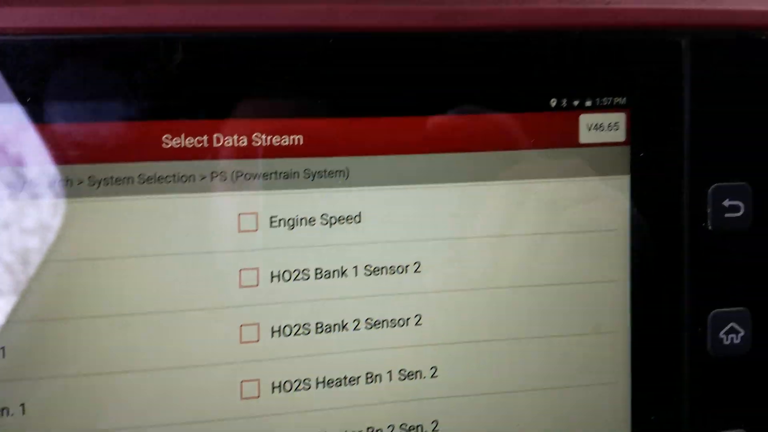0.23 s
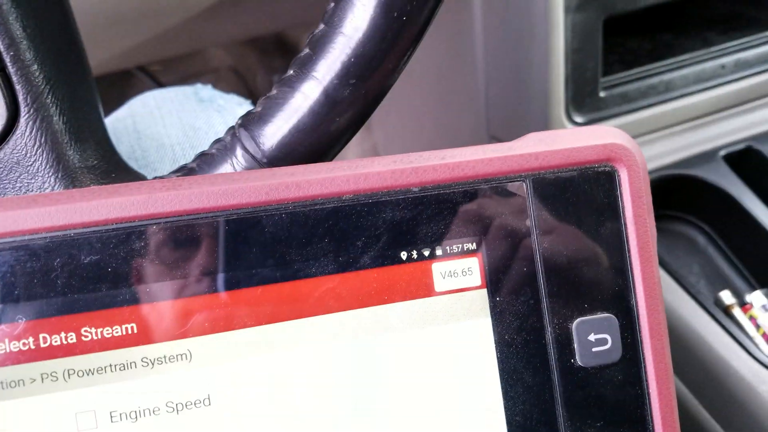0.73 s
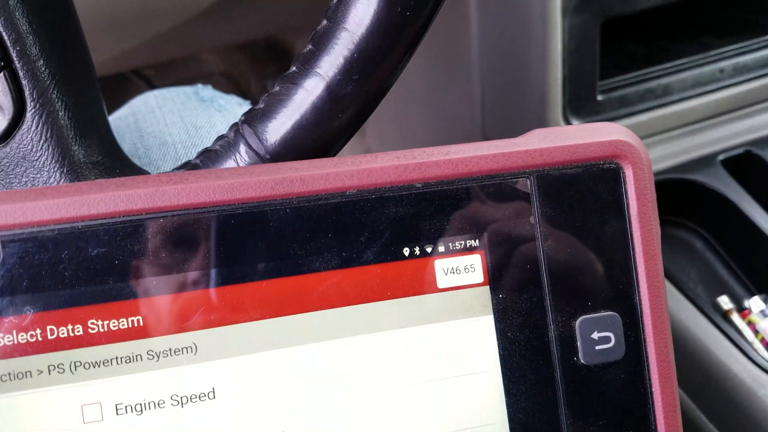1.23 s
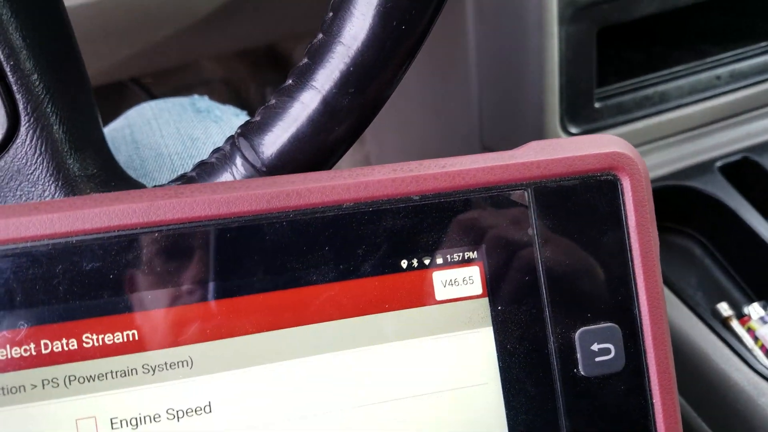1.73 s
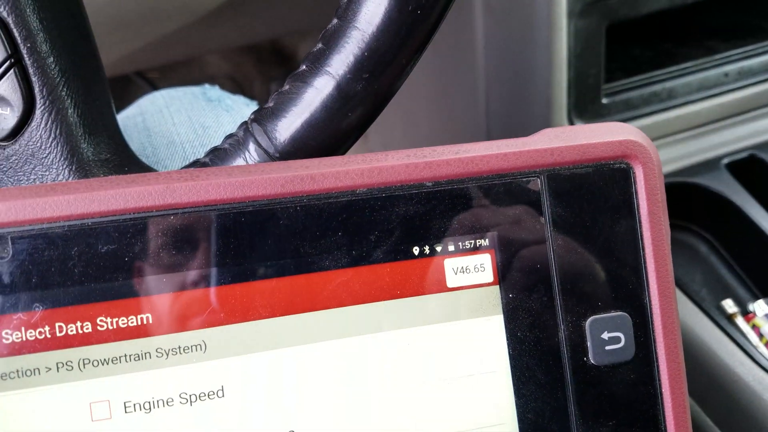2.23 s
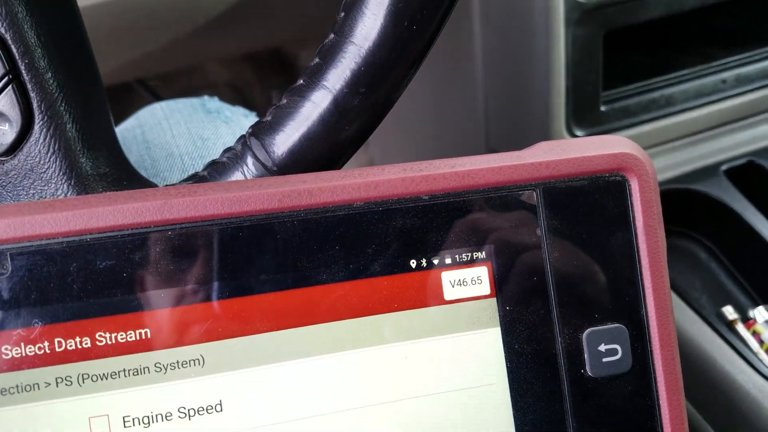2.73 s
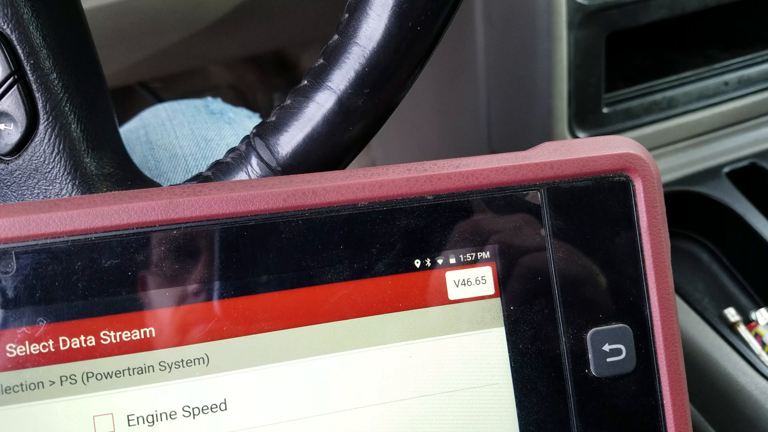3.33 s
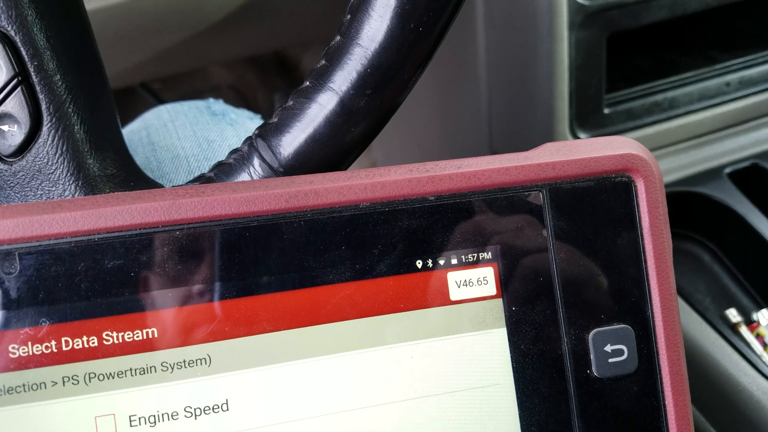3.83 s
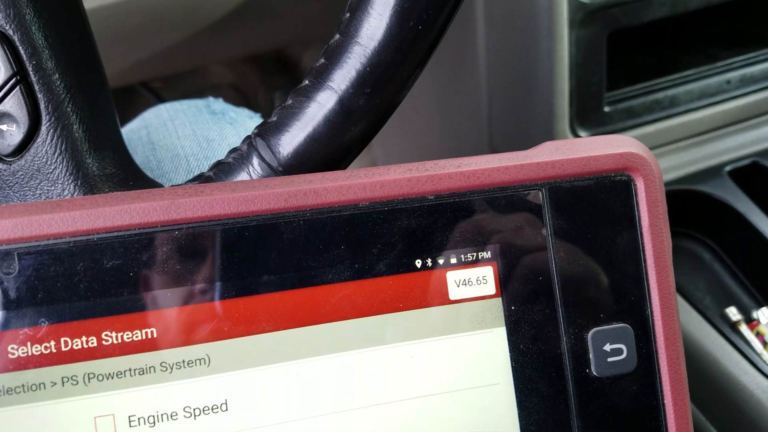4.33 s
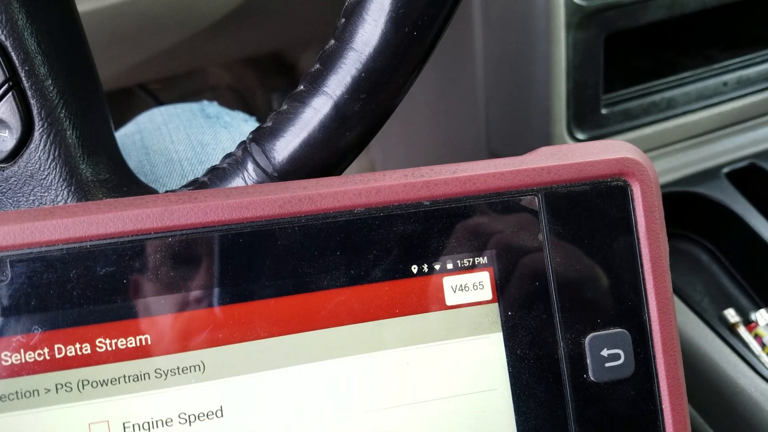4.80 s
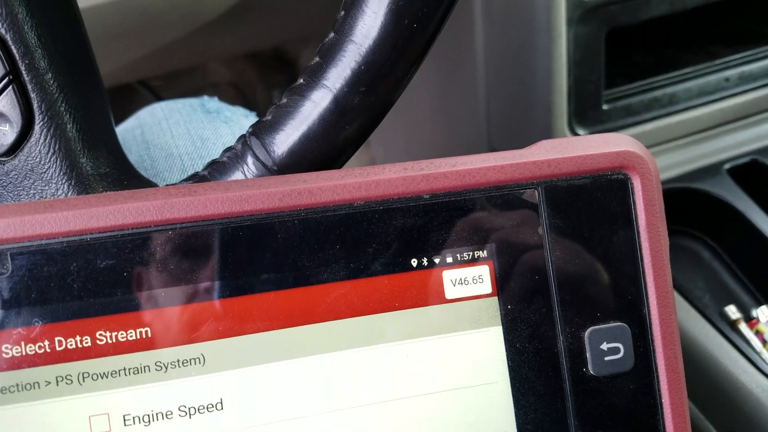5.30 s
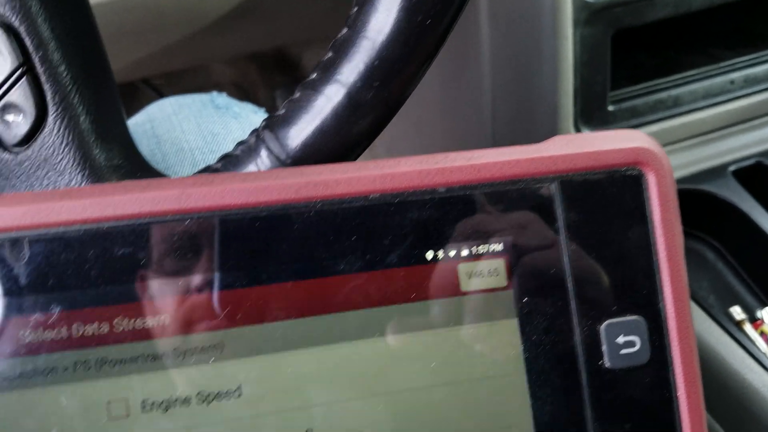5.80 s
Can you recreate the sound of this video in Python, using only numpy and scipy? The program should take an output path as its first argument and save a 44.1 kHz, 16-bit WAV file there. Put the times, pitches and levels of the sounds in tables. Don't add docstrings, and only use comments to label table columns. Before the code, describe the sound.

Continuous rough idle of a big petrol engine, captured in stereo within the cab. Bassy lumpy firing pulses dominate, about five engine cycles a second, with swelling rumble in the footwell and dull panel thuds. Irregular metallic ticks and a light airy rattle ride above. The effort hunts early and becomes steadier later; two airy fabric strokes pass close by near the end. The sound never stops.

```python
import sys
import numpy as np
from scipy import signal
from scipy.fft import rfft, irfft, next_fast_len
from scipy.io import wavfile
from scipy.ndimage import uniform_filter1d

SR = 44100
rng = np.random.default_rng(int(sys.argv[2]) if len(sys.argv) > 2 else 0)


def digitize_waveform(pressure):
    field = np.atleast_2d(pressure).T
    bounded = np.clip(field, -1, 1)
    quanta = np.round(bounded * 32767).astype(np.int16)
    wavfile.write(sys.argv[1], SR, quanta)


def elevation(decibels):
    levels = np.asarray(decibels, float)
    return 10 ** (levels / 20)


N = 267157
T = np.arange(N) / SR

CYCLE_HZ = 5.39
# time_s, lead_cycles
CRANK_LEAD = [(0.0, 0.0006), (0.337, 0.0392), (0.673, 0.012), (0.841, 0.0321), (1.178, 0.0107),
              (1.514, 0.0079), (1.851, -0.0194), (2.188, -0.0047), (2.524, -0.0153), (2.692, -0.0051),
              (3.702, -0.0117), (4.207, 0.0121), (4.375, -0.0193), (4.712, 0.0055), (4.88, -0.0003),
              (5.553, -0.0044), (5.721, 0.008), (6.058, 0.0047)]
# time_s, effort_db
LOAD = [(0, 5.5), (.17, 5), (.47, -2.5), (.72, 4), (1.03, -2.5), (1.32, 2.5), (1.6, -2.5), (2.2, -0.5),
        (3.3, -3), (3.8, 1), (4.1, -0.5), (4.4, 2.5), (4.7, 0), (5.2, -1.5), (6.06, -1)]
# place_cycles, strength_db
CYLINDERS = [(-0.013, -10.8), (0.125, 0.1), (0.243, -6.7), (0.335, -4.9), (0.485, 0.0), (0.559, -3.9),
             (0.761, -2.6), (0.857, -4.5)]
# pitch_hz, width_hz, level_db, sign
CAB = [(26.5, 6, -34.5, 1), (51.5, 14.1, -17.7, 1), (49.3, 7, -13.8, -1), (83.3, 6.1, -23.7, 1),
       (92.1, 25.8, -27.2, -1), (146.9, 11, -22.2, -1), (147.9, 6, -20.5, 1), (117.6, 7.8, -33.1, 1)]
# pitch_hz, level_db
RUMBLE = [(22, -12), (36, -10.5), (50, 0), (66, -3.5), (88, -4.5), (100, -3), (132, 0), (152, -1.5),
          (180, -9), (192, -21.5), (215, -19.5), (235, -23), (350, -23), (480, -44)]
# peak_s, level_db, pitch_hz
SURGES = [(0.169, -10, 171.3), (0.513, -15, 168), (0.765, -16, 179), (1.323, -13, 169), (1.64, -13, 174.7),
          (1.823, -15.5, 174.3), (2.003, -15.0, 163), (2.451, -14, 176), (2.743, -25, 172),
          (3.009, -20, 174), (3.12, -21, 174), (3.307, -24.5, 174), (3.488, -17.5, 167.5),
          (3.759, -13, 178), (4.04, -34, 164), (4.423, -10.7, 173), (4.485, -12, 181), (4.792, -17, 161),
          (5.043, -16.5, 173.6), (5.152, -18, 162), (5.341, -19.5, 165.4), (5.6, -10.5, 175.3),
          (5.698, -9, 153.5)]
# peak_s, level_db, pitch_hz
THUMPS = [(0.01, -20.7, 300), (0.048, -23.0, 322), (0.121, -25.0, 288), (0.178, -23, 309),
          (0.249, -21.5, 300), (0.297, -23.5, 295), (0.56, -17.5, 313), (0.71, -22.5, 294),
          (1.094, -25.5, 294), (1.129, -27, 300), (1.263, -21.0, 312), (1.829, -25, 294), (2.05, -22, 304),
          (2.388, -24, 301), (2.469, -24.5, 315), (2.603, -24, 299), (2.946, -18, 297), (3.028, -20, 310),
          (3.348, -29, 303), (3.77, -20.5, 308.5), (3.865, -17, 298), (3.959, -22.5, 302),
          (4.088, -19.5, 304), (4.459, -16.5, 300), (4.58, -29, 282), (4.978, -24.1, 301),
          (5.012, -22.5, 294), (5.535, -23.5, 296), (5.565, -23, 301), (5.91, -18.8, 304)]
# place_cycles, door_panel_db, clatter_db, length_s
KNOCKS = [(.5, -30, -1.5, 0.034), (.24, -39.5, 0, 0.044), (.9, -44, 2.5, 0.026), (0.664, -45, -11.5, 0.066),
          (0.32, -44.5, -23.5, 0.0061), (0.088, -39.5, -4, 0.03)]
# pitch_hz, width_hz, level_db
CLATTER = [(607, 61, -59.5), (745, 30, -54), (808, 48, -51.5), (1880, 67, -56), (2027, 65, -58.5),
           (2220, 27, -57.5), (2490, 38, -61.5), (2777, 80, -63.5), (3252, 34, -62.5), (3480, 59, -63.5),
           (3870, 49, -64.5), (4400, 130, -77), (5010, 130, -67.5), (5490, 110, -68.5), (6230, 160, -82)]
# pitch_hz, density_db_per_hz
ROAR = [(450, -11.5), (490, -14), (560, -10), (820, -11.5), (1100, -8), (1550, -14), (1830, -14.5),
        (2180, -22), (3060, -22.5), (4400, -43.5), (6000, -33), (9000, -40)]
# pitch_hz, density_db_per_hz
HISS = [(2000, -9.5), (3000, 3), (5000, -1.5), (6700, -3), (7300, -7), (9300, -13), (11500, -4),
        (14000, -3), (16500, -5.5)]
# place_cycles, low_ring_db, high_ring_db, high_ring_hz
TAPPETS = [(.94, -44.5, -53, 3400), (.555, -38, -47.5, 5080), (.24, -48, -65, 2200),
           (0.099, -49.5, -51.5, 2300)]
TAPPET_HZ = (1870, 1990, 2210, 2450)
# start_s, low_ring_db, low_ring_hz, high_ring_db
LOUD_TICKS = [(0.0937, -41, 2060, -54), (0.157, -30, 2200, -35), (0.2443, -31, 2230, -64),
              (0.7203, -29, 1910, -42), (0.8425, -47, 2220, -36), (0.9168, -36, 1910, -46),
              (1.103, -39, 2030, -74), (1.2082, -44, 1890, -48), (1.3578, -33, 2280, -53),
              (1.8043, -31, 1860, -43), (2.0482, -46, 2050, -38), (2.144, -33.5, 2450, -38.5),
              (2.2174, -30, 2220, -53), (2.4049, -36, 1990, -65), (2.4588, -33, 2110, -51),
              (2.5726, -28, 1880, -34.5), (3.0749, -33.5, 2210, -43), (3.8157, -30.5, 1856, -58),
              (4.1839, -32, 1870, -44), (4.377, -32.5, 2130, -45), (4.4722, -37, 1790, -35),
              (4.6404, -35.5, 2490, -46), (4.7446, -34, 2200, -45), (4.9851, -34.5, 2290, -34.5),
              (5.1158, -32, 2210, -44.5), (5.6595, -30, 1850, -41), (5.7418, -31, 1953, -65),
              (5.8566, -34.5, 2210, -51)]
# peak_s, over_hiss_db, rise_s, fall_s
BRUSHES = [
    (4.94, 6, 0.32, 0.16),
    (5.42, 8, 0.086, .22),
]
# pitch_hz, shared_fraction
ALIKE = [(100, .995), (300, .95), (600, .8), (1200, .74), (2400, .52), (5000, .34), (9000, .15)]
# pitch_hz, left_minus_right_db
TILT = [(40, -.6), (80, .5), (160, .2), (300, 0), (1000, -1.3), (2400, -3.8), (4400, -4), (7500, -13),
        (10000, -13), (13000, -3)]
# pitch_hz, delay_ms
LAG = [(100, .38), (170, .38), (300, .22), (550, .17), (1200, .4), (3000, .44), (15000, .5)]


def evened(x):
    return x / np.sqrt(np.mean(x ** 2) + 1e-20)


def read(points, hz):
    f, value = np.transpose(points)
    return np.interp(np.log(hz + 1), np.log(f + 1), value)


def colour(x, points):
    hz = abs(np.fft.fftfreq(32768, 1 / SR))
    below = (points[0][0] / 2, points[0][1] - 30)
    above = (points[-1][0] * 2, points[-1][1] - 30)
    log_gain = np.log(elevation(read([below] + list(points) + [above], hz)))
    response = np.exp(log_gain - 1j * signal.hilbert(log_gain).imag)
    taps = np.fft.ifft(response).real[:12000]
    return evened(signal.oaconvolve(x, taps[None], axes=1)[:, :N])


def ring(x, hz, width_hz):
    b, a = signal.iirpeak(hz, hz / width_hz, SR)
    return signal.sosfilt([[*b, *a]] * 2, x)


def puff(length_s):
    u = np.arange(round(5 * length_s * SR)) / (length_s * SR)
    return np.e * 2 * u * np.exp(-2 * u)


def swells(rows, length_s):
    out = np.zeros(N)
    for s, db, hz in rows:
        first, last = round((s - length_s / 2) * SR), round((s + length_s / 2) * SR)
        near = slice(max(first, 0), last)
        t = T[near] - s
        out[near] += elevation(db) * np.cos(np.pi * t / length_s) ** 2 * np.sin(2 * np.pi * hz * t)
    return out


def patchy(x, spread_db):
    z = signal.stft(x, nperseg=256)[2]
    patches = uniform_filter1d(rng.standard_normal(z.shape[1:]), size=4, axis=0)
    patches = uniform_filter1d(patches, size=9, axis=1)
    return evened(signal.istft(z * elevation(spread_db * evened(patches)), nperseg=256)[1][:, :N])


def cycles():
    return CYCLE_HZ * T + np.interp(T, *np.transpose(CRANK_LEAD))


def load_db():
    return np.interp(T, *np.transpose(LOAD))


def strikes(place, spread_db, jitter_s):
    draw = rng.standard_normal((40, 2))
    on_time_s = np.interp(np.arange(-1, 39) + place, cycles(), T, -1, 99)
    at = (on_time_s + jitter_s * draw[:, 0]) * SR
    inside = (at >= 0) & (at < N - 1)
    out = np.zeros(N)
    out[at[inside].astype(int)] = elevation(spread_db * draw[inside, 1])
    return out


def hiss(gate):
    base_db = -62.5
    brush_db = 0
    for s, db, rise, fall in BRUSHES:
        brush_db = brush_db + db * np.interp(T, [s - rise, s, s + fall], [0, 1, 0]) ** 0.76
    rise_db = 0.43 * load_db() + brush_db
    fill = np.clip(rise_db / 1.5, 0, .93)
    air = evened((0.091 + gate) ** 1.15) * (1 - fill) + fill
    noise = colour(air * rng.standard_normal((2, N)), HISS)
    return elevation(base_db + rise_db + 9) * patchy(noise, spread_db=1.5)


def clatter(gate):
    steady_roar = 2
    out = elevation(-47) * colour((steady_roar + gate) * rng.standard_normal((2, N)), ROAR)
    drive = (.22 + gate) * rng.standard_normal((2, N))
    steps = np.arange(0, T[-1] + .02, .02)
    for hz, width_hz, db in CLATTER:
        luck_db = 4 * np.interp(T, steps, np.clip(rng.standard_normal(len(steps)), -2, 2))
        out += elevation(db) * evened(ring(drive * elevation(luck_db), hz, width_hz * 2.15))
    return elevation(0.3 * load_db()) * out


def tick_list():
    rounds, spread_db = 33, 2.5
    crank, rows = cycles(), []
    luck = np.clip(rng.standard_normal((rounds, len(TAPPETS), 4)), -2, 2)
    pick = rng.integers(0, len(TAPPET_HZ), luck.shape[:2])
    loud_s, places = np.transpose(LOUD_TICKS)[0], np.transpose(TAPPETS)[0]
    for n in range(rounds):
        for (place, db, high_db, high_hz), draw, k in zip(TAPPETS, luck[n], pick[n]):
            s = np.interp(n + place, crank, T) + 0.0018 * draw[0]
            if abs(loud_s - s).min() > .025 and s < T[-1]:
                low_db, top_db = db + spread_db * draw[1], high_db + spread_db * draw[2]
                rows.append((s, low_db, TAPPET_HZ[k], top_db, high_hz * (1 + .02 * draw[3])))
    for s, db, hz, high_db in LOUD_TICKS:
        nearest = np.argmin(abs((np.interp(s, T, crank) - places + .5) % 1 - .5))
        rows.append((s, db, hz, high_db, TAPPETS[nearest][3]))
    return rows


def tappets():
    out, burst, shape = np.zeros((2, N)), np.zeros(N), puff(length_s=0.017)
    t, luck = T[:len(shape)], rng.random((170, 2, 7, 2))
    spread = np.array([[0], [.02], [.06], [.1], [.16], [.22], [.3]])
    for (s, db, hz, high_db, high_hz), draw in zip(tick_list()[::-1], luck):
        start = round(max(s - .003, 0) * SR)
        at = slice(start, start + len(shape))
        detune, phase = 1 + spread * (draw[..., :1] - .5), 2 * np.pi * draw[..., 1:]
        low = elevation(db - 19.5) * np.sin(2 * np.pi * hz * detune * t + phase).sum(1)
        high = elevation(high_db - 17) * np.sin(2 * np.pi * high_hz * detune ** .4 * t + phase).sum(1)
        room = len(burst[at])
        out[:, at] += (shape * (low + high))[:, :room]
        burst[at] += (elevation(.8 * (high_db + 52)) * shape)[:room]
    return out, burst


def rattle_gate(spread_db):
    gate = np.zeros(N)
    for place, _, db, length_s in KNOCKS:
        clicks = strikes(place + 0.022, spread_db, jitter_s=0.0025)
        gate += elevation(db) * signal.oaconvolve(clicks, puff(length_s))[:N]
    return gate


def valve_gear():
    ticks, burst = tappets()
    gate = abs(rattle_gate(spread_db=1.5) + 0.22 * burst)
    return ticks + clatter(gate) + hiss(gate)


def door_panel():
    hits = sum(elevation(db) * strikes(place + 0.011, spread_db=1.1, jitter_s=0.001374)
               for place, db, _, _ in KNOCKS)
    shape = puff(length_s=0.032)
    hz = 403 + 36 * np.exp(-T[:len(shape)] / .018)
    tone = shape * np.sin(2 * np.pi * np.cumsum(hz) / SR)
    hum = elevation(-47.5) * evened(ring(rng.standard_normal((2, N)), hz=414, width_hz=50))
    return signal.oaconvolve(hits, tone)[:N] + hum


def floor_panel():
    sway = 1 + .6 * np.cos(2 * np.pi * (cycles() - .93))
    hum = elevation(-36) * evened(ring(sway * rng.standard_normal((2, N)), hz=298.3, width_hz=26.0))
    return hum + swells(THUMPS, length_s=0.044)


def rumble():
    burns = sum(elevation(db) * strikes(place, spread_db=3.5, jitter_s=0.0036) for place, db in CYLINDERS)
    flow = 1.75 + signal.oaconvolve(burns, puff(length_s=0.006))[:N]
    puffs = flow * rng.standard_normal((2, N))
    shake = colour(puffs, RUMBLE)
    deep = signal.sosfiltfilt(signal.butter(3, 100, fs=SR, output="sos"), shake)
    upper = elevation(0.73 * load_db() - 2.0) * (shake - deep)
    footwell = sum(ring(ring(puffs, hz, 16.1), hz, 16.1) for hz in (163, 177))
    footwell = elevation(-26.5) * evened(footwell) + elevation(-1.5) * swells(SURGES, length_s=0.1)
    return elevation(-17.0) * (deep + upper) + footwell


def boom():
    place, db = np.transpose(CYLINDERS)
    angle, cycle = np.linspace(0, 1, 4097), 0
    for k in range(3, 35):
        f = k * CYCLE_HZ
        cab = sum(sign * elevation(g) * w * f / (hz ** 2 - f ** 2 + 1j * f * w) for hz, w, g, sign in CAB)
        firing = np.sum(elevation(db) * np.exp(-2j * np.pi * k * place))
        cycle += (cab * firing * np.exp(2j * np.pi * k * angle)).real
    return elevation(-0.44) * np.interp(cycles() % 1, angle, cycle)


def microphones(pair):
    size = next_fast_len(N + 8192)
    hz = np.fft.rfftfreq(size, 1 / SR)
    fade = np.linspace(0, 1, size - N)
    seam = pair[:, -1:] * (1 - fade) + pair[:, :1] * fade
    a, b = rfft(np.hstack([pair, seam]))
    alike, tilt = np.clip(read(ALIKE, hz), 0, 1), elevation(read(TILT, hz) / 2)
    delay = np.exp(-2j * np.pi * hz * read(LAG, hz) / 1000)
    right = (alike * a + np.sqrt(1 - alike ** 2) * b) * delay
    return irfft([a * tilt, right / tilt], size)[:, :N]


def scene():
    return microphones(valve_gear() + door_panel() + floor_panel() + rumble() + boom())


def roll_off(x):
    return signal.sosfilt(signal.butter(12, 15830, fs=SR, output="sos"), x)


def record(dry):
    soft = 1.067 * np.tanh(dry / 1.037)
    return roll_off(soft)


dry = scene()
out = record(dry)
digitize_waveform(out)
```